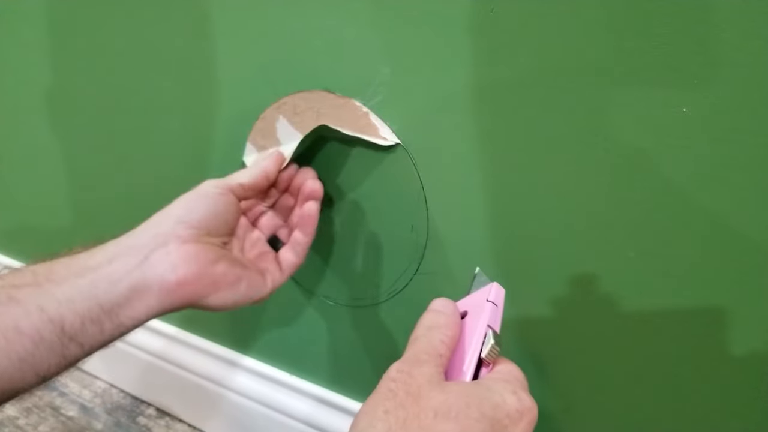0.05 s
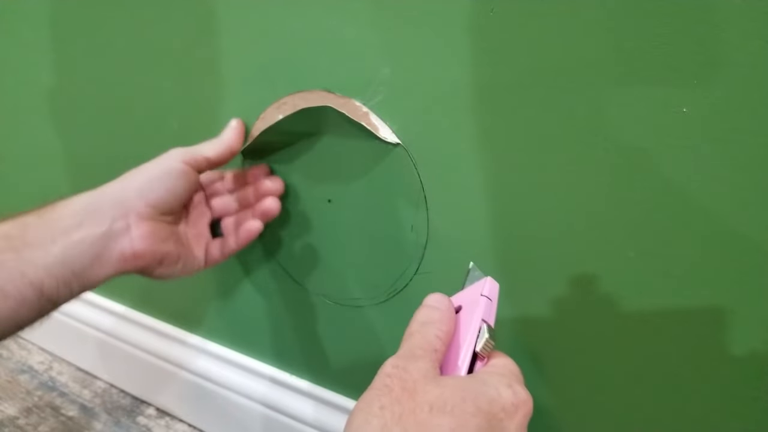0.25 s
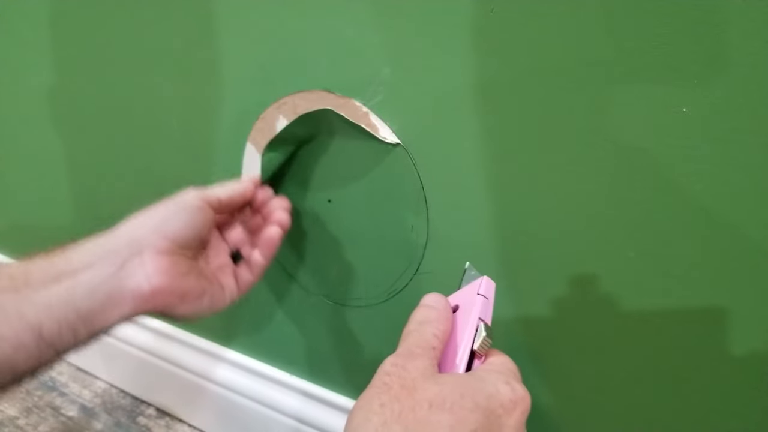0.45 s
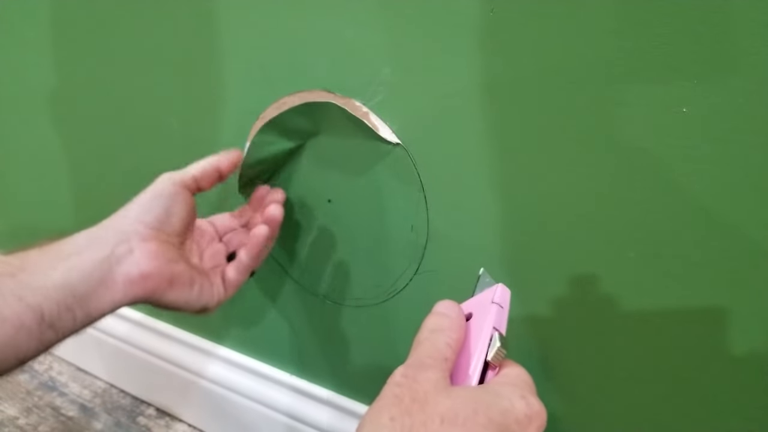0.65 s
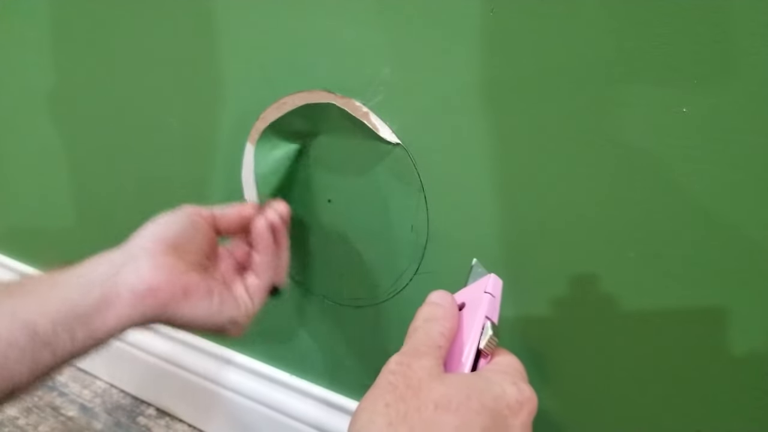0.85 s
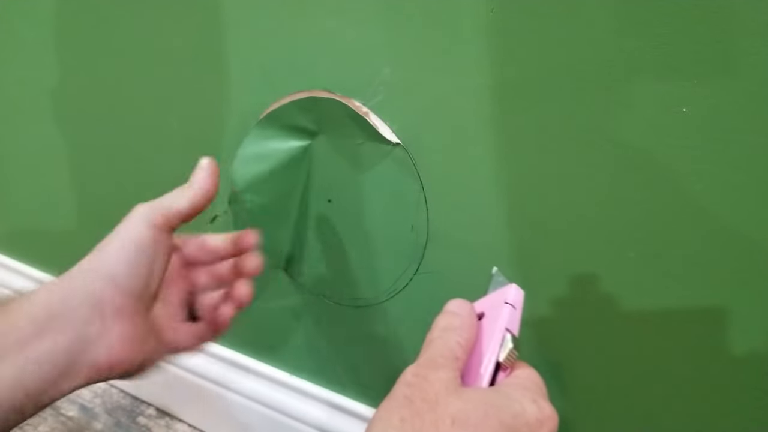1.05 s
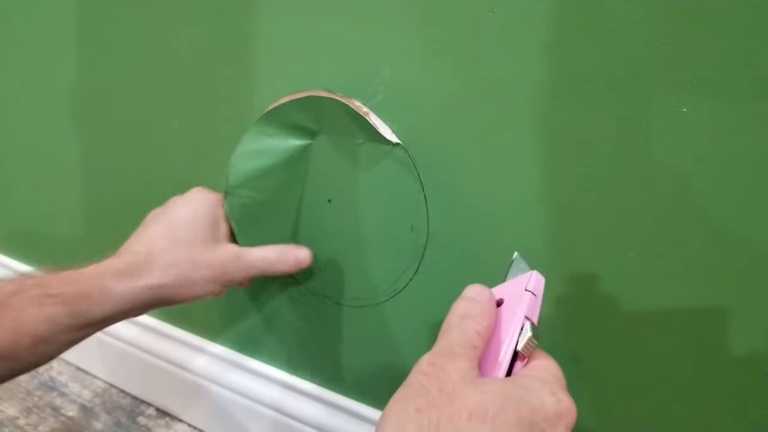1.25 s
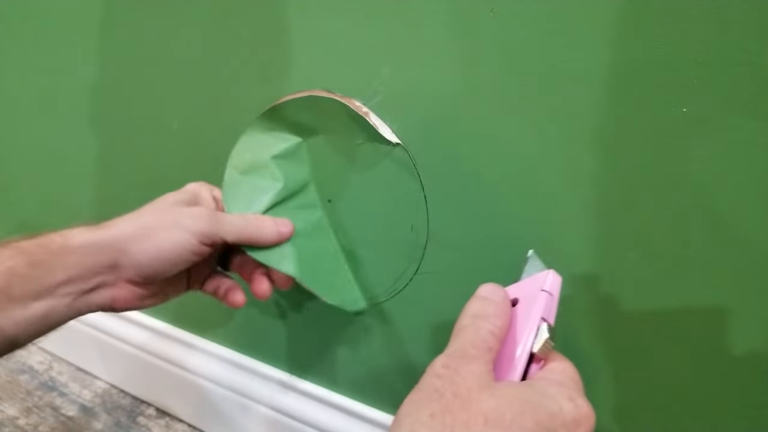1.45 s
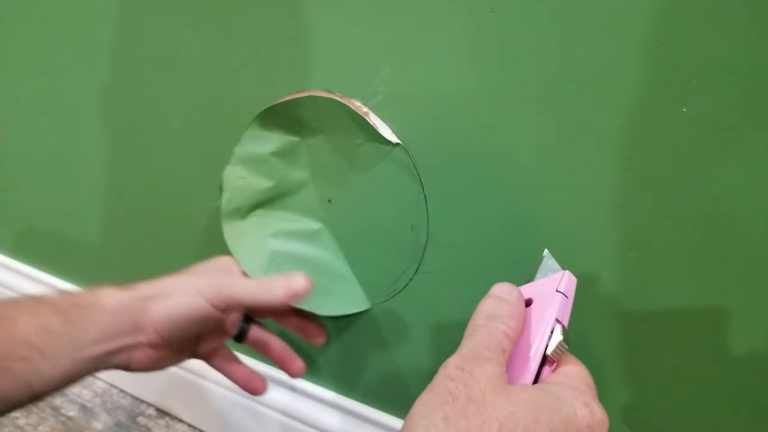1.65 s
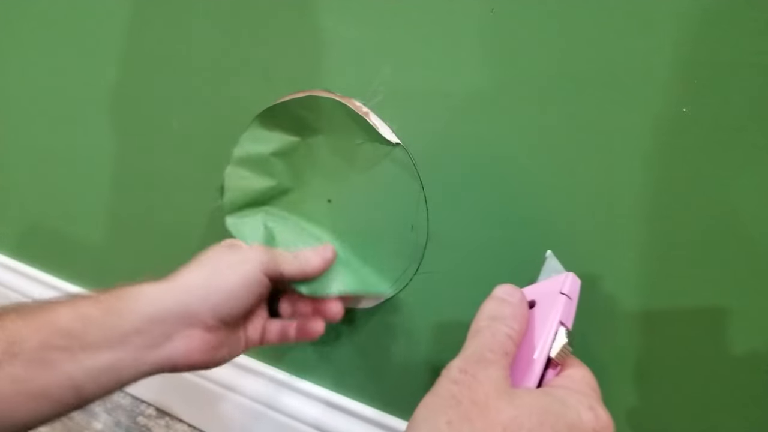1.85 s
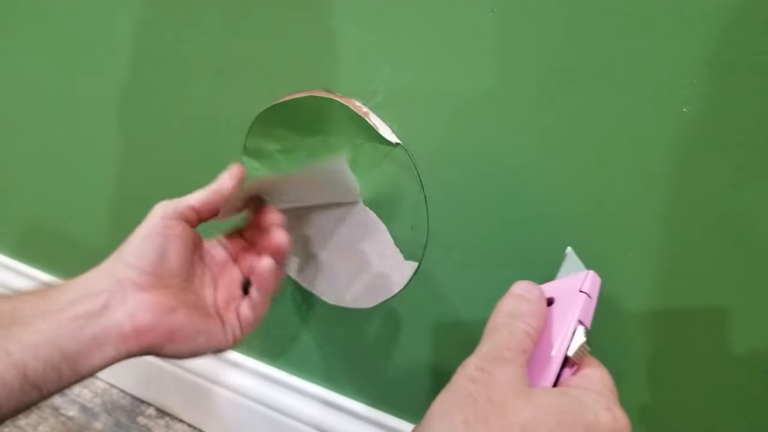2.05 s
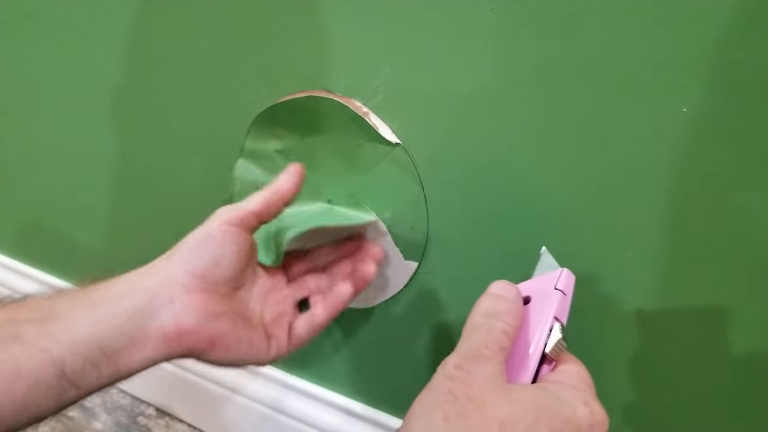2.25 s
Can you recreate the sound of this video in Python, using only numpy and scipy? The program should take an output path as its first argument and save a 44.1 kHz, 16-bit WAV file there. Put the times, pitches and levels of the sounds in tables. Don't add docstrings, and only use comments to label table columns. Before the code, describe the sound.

Painted paper is torn off drywall by hand in short uneven rips, with crisp snaps and soft hollow thumps of the board, pausing twice before more tearing, in a bare reverberant room, heard close on a phone.

```python
import sys
import numpy as np
from scipy import signal
from scipy.fft import rfft, irfft
from scipy.io import wavfile
from scipy.ndimage import uniform_filter1d

SR = 44100
rng = np.random.default_rng(int(sys.argv[2]) if len(sys.argv) > 2 else 0)


def bounce(signal):
    frames = np.transpose(np.atleast_2d(signal))
    limited = np.clip(frames, -1, 1)
    pcm = np.round(limited * 32767).astype(np.int16)
    wavfile.write(sys.argv[1], SR, pcm)


def natural_amplitude(level_db):
    exponent = np.asarray(level_db, float) / 20
    return 10 ** exponent


N = 101429
LN_60DB = np.log(1000)
SIDES = np.array([[1], [-1]])


def on_log(table, hz):
    f, v = np.array(table, float).T
    return np.interp(np.log(hz), np.log(f), v)


def unit(x):
    return x / np.sqrt(np.mean(x ** 2))


def equalise(x, table):
    hz = np.arange(N // 2 + 1) * SR / N + 1
    return irfft(rfft(x) * natural_amplitude(on_log(table, hz)), N)


def colour(x, table):
    return unit(equalise(x, table))


def band(x, hz, width_hz):
    return signal.lfilter(*signal.iirpeak(min(hz, .45 * SR), hz / width_hz, fs=SR), x)


def butter(x, order, hz, kind):
    return signal.sosfilt(signal.butter(order, hz, kind, fs=SR, output="sos"), x)


def clicks(rate_hz, scatter_db):
    hit = rng.random(N) < rate_hz / SR
    size_db = scatter_db * np.minimum(rng.exponential(size=N), 3.5)
    sign = rng.standard_normal(N).clip(-2, 2)
    return unit(hit * natural_amplitude(size_db) * sign)


def walk(rate_hz):
    k = int(SR / rate_hz)
    smooth = uniform_filter1d(rng.standard_normal(N), k)
    return unit(uniform_filter1d(smooth, k))


# (frequency [Hz], density [dB per Hz])
FLOOR = [(30, -27), (110, 14), (300, -7), (700, 2.5), (1500, -2.5), (5000, -5), (9000, -14), (16000, -34)]
# (time [s], level [dB])
HUM_DB = [
    (0, -45),
    (1.3, -49),
    (1.45, -57),
    (2.3, -48.5),
]


def background():
    floor_db, wide_above_hz = -46.5, 854
    hum_hz, hum_width_hz = 59, 5
    mid = colour(rng.standard_normal(N), FLOOR)
    side = butter(colour(rng.standard_normal(N), FLOOR), 1, wide_above_hz, "high")
    t = np.arange(N) / SR
    waver = unit(band(rng.standard_normal(N), hum_hz, hum_width_hz))
    hum = np.sqrt(2) * np.sin(2 * np.pi * hum_hz * t) + .5 * waver
    hum_db = np.interp(t, *np.array(HUM_DB).T)
    return natural_amplitude(floor_db) * (mid + side * SIDES) + hum * natural_amplitude(hum_db)


# (frequency [Hz], t60 [s])
ROOM_T60 = [(125, 0.22), (500, 0.67), (1500, 0.73), (4000, 0.68), (8000, 0.32), (14000, 0.33)]
# (frequency [Hz], level [dB])
ROOM_DB = [(125, -14), (500, -9), (1500, -1.5), (4000, -11), (8000, -2), (14000, -20)]


def room(x):
    build_s = .02
    t = np.arange(int(1.2 * SR)) / SR
    tail = 0
    for hz in 90 * 2 ** np.arange(0, 7.6, .5):
        noise = band(rng.standard_normal((2, len(t))), hz, hz / 2.78)
        noise = noise + max(0, 1 - hz / 1000) * 0.55 * noise[::-1]
        decay = np.exp(-LN_60DB * t / on_log(ROOM_T60, hz))
        fade = noise * decay * (t / build_s).clip(0, 1)
        level = np.sqrt(hz / SR / np.mean(np.sum(fade ** 2, 1)))
        tail = tail + natural_amplitude(on_log(ROOM_DB, hz)) * fade * level
    return signal.fftconvolve(x[None], tail, axes=1)[:, :N]


def earlier_rip():
    return natural_amplitude(-4.5) * (np.arange(N) < 40) * band(rng.standard_normal(N), 2800, 2600)


def pull(start_s, length_s):
    rise_share, release_s = .42, .012
    t = np.arange(N) / SR - start_s
    rise = np.clip(t / (rise_share * length_s), 0, 1)
    release = np.exp(-np.maximum(t - length_s, 0) / release_s)
    return np.sin(np.pi / 2 * rise) ** 2 * release


# (start [s], length [s], fibre hiss [dB], flap ring re hiss [dB], board boom re hiss [dB])
RIPS = [(-.02, 0.041, -38.5, -1, -3.5), (0.081, 0.067, -53, 9.5, 7), (0.242, .035, -58, 3, 17),
        (0.276, 0.041, -36, -5, -3.5), (0.371, 0.072, -29.5, -0.5, -4), (0.434, 0.039, -42, 17, -2),
        (0.58, 0.02, -36, -2, -16), (0.693, 0.033, -35, 4, -2.5), (0.781, 0.029, -38, 17.5, 0),
        (.8, 0.082, -26.5, 4.5, -4.5), (0.874, 0.097, -38, -13, -2.5), (1.207, 0.042, -67.5, 19, 29.5),
        (1.236, 0.086, -46.5, 10, 8.5), (1.311, 0.046, -35, 6.5, -4.5), (1.357, 0.068, -33, 3.5, 2.5),
        (1.413, 0.071, -45.5, -7, 3), (1.507, 0.014, -36, -2, -2), (1.709, 0.046, -54, 10, 22.5),
        (1.766, 0.033, -36.5, 0, -1), (1.821, 0.041, -38, -2, 3), (1.833, 0.035, -29.5, -5, 3.5),
        (1.863, 0.073, -30, -1.5, 4.5), (1.923, 0.11, -38.5, -4, 2.5), (2.11, 0.034, -51, -12, 8)]


def forces(column):
    total = 0
    for row in RIPS:
        db = row[2] + (row[column] if column else 0)
        total = total + pull(row[0], row[1]) * natural_amplitude(db)
    return total


# (frequency [Hz], density [dB per Hz])
HISS = [(400, 10), (1000, -5.5), (2000, -18.5), (4000, 6), (7000, -1), (11000, -1.5), (16000, -9)]
# (frequency [Hz], width [Hz], level [dB])
FLAP = [(770, 500, -13), (1700, 450, -1), (2190, 550, -1), (3050, 830, -0.5), (3820, 580, -1),
        (5000, 1400, -8), (6550, 1300, -7)]


def tear(patches):
    fibres = clicks(rate_hz=9000, scatter_db=2.5)
    flap = 0
    for k, (hz, width_hz, db) in enumerate(FLAP):
        part = np.roll(fibres, 997 * (k + 1)) * patches
        sway = natural_amplitude(2.2 * walk(70))
        flap = flap + natural_amplitude(db) * sway * band(part, hz, max(width_hz, hz / 4.5))
    hiss = colour(fibres * patches, HISS)
    return hiss * forces(column=0) * natural_amplitude(5.0) + unit(flap) * forces(column=3)


# (frequency [Hz], level [dB], t60 [s])
BOARD = [(139, -7, 0.027), (183, 5.5, 0.14), (228.6, 4, 0.16), (287.4, 2.5, 0.065), (333, -3, 0.1),
         (427, -7, 0.053), (656, -11, 0.017)]


def board(force):
    ring = sum(natural_amplitude(db) * band(force, hz, LN_60DB / np.pi / t60_s) for hz, db, t60_s in BOARD)
    return butter(ring, 3, 135, "high")


def boom():
    tugs = uniform_filter1d(clicks(rate_hz=800, scatter_db=1.8), size=30)
    return board(tugs * forces(column=4)) / np.std(board(tugs))


# (time [s], peak [dB], main mode [Hz])
TOUCHES = [(0.095, -27, 192), (0.206, -19.5, 191), (0.228, -18, 200), (0.393, -18, 181), (0.67, -23, 192),
           (0.682, -20, 182), (0.85, -22, 237), (0.89, -16, 186), (1.213, -21.5, 182), (1.301, -29, 328),
           (1.667, -22.5, 205), (1.687, -24.5, 273), (1.727, -27, 218), (1.749, -18.5, 360),
           (1.785, -17, 422), (1.841, -19.5, 665), (1.875, -40, 291), (1.884, -15, 200),
           (2.226, -34.5, 413), (2.286, -27.5, 338)]


def touches():
    push_ms, rise_s, t60_s, gain_db = 1.36, 0.00067, .042, 0.5
    size = 8000
    out, t = np.zeros(N + size), np.arange(size) / SR
    push = signal.windows.hann(int(push_ms * SR / 1000) + 2)
    rest = board(np.pad(push, (0, size - len(push))))
    neighbours = 0.17 * rest / np.abs(rest).max()
    envelope = np.exp(-LN_60DB * t / t60_s) * (1 - np.exp(-t / rise_s))
    for s, db, hz in TOUCHES:
        knock = np.sin(2 * np.pi * hz * t) * envelope + neighbours
        i = int(s * SR)
        out[i:i + size] -= natural_amplitude(db + gain_db) * knock
    return butter(out[:N], 2, 90, "high")


# (time [s], peak [dB], ring [Hz], length [ms])
SNAPS = [(0.433, -3.5, 1686, 3.76), (0.7881, -7, 2800, 2), (0.8865, -8.5, 7200, 3.2),
         (1.259, -18.5, 2240, 3.5), (1.3004, -24, 2440, 2.9), (1.3266, -13.5, 990, 2),
         (1.3406, -4, 2280, 2.76), (1.3511, -8, 2580, 4.4), (1.5118, -23.5, 1920, 4.4),
         (1.7325, -28.5, 2050, 5.7), (1.7498, -14, 1950, 3.8), (1.7744, -12, 7460, 3.6),
         (1.7858, -18.5, 2140, 8.5), (1.8183, -21, 1270, 1.5), (1.8413, -3.5, 2290, 2.86),
         (1.92, -8, 6470, 4.4), (2.15, -37, 3840, 4.1), (2.2256, -45, 1335, 3.1), (2.2858, -31, 2160, 2.5)]


def snaps():
    ring_share, ring_q, edge, attack_s, gain_db = .28, 2.5, .15, .0003, 5
    size = 2000
    out, t = np.zeros(N + size), np.arange(size) / SR
    for s, db, hz, ms in SNAPS:
        gate = (t / attack_s).clip(0, 1) * np.exp(-(t * 1000 / ms) ** 4)
        burst = rng.standard_normal(size) * gate
        wide = butter(burst, 2, [1100, 6800], "band") + edge * burst
        ring = band(band(burst, hz, hz / ring_q), hz, hz / ring_q)
        crack = ring_share * ring / np.abs(ring).max() + (1 - ring_share) * wide / np.abs(wide).max()
        i = int(s * SR)
        out[i:i + size] += natural_amplitude(db + gain_db) * crack / np.abs(crack).max()
    return out[:N]


def reflections(x):
    echo = rng.standard_normal((2, 300)) * np.exp(-np.arange(300) / 60.)
    echo = np.diff(echo, axis=1, prepend=0)
    echo = echo / np.sqrt(np.sum(echo ** 2, 1))[:, None]
    return signal.fftconvolve(x[None], echo, axes=1)[:, :N]


def scene():
    pan_db, room_pan_db, port_lag_s, port_spread = 2.5, 2.86, .0001, .45
    edge_share, boom_left_db, patchy_db = .55, 2, 1.4
    patches = natural_amplitude(patchy_db * walk(100))
    middle = tear(patches)
    ends = np.array([tear(patches), tear(patches)])
    low = touches() + boom()
    solid = snaps() + low
    wall = solid + np.sqrt(1 - edge_share) * middle
    n = np.arange(N)
    lagged = np.interp(n - port_lag_s * SR, n, wall)
    near = np.array([wall, lagged]) + np.sqrt(edge_share) * ends
    near[0] += (natural_amplitude(boom_left_db) - 1) * low
    near = near + port_spread * reflections(wall)
    far = room(solid + middle + earlier_rip())
    return near * natural_amplitude(SIDES * pan_db / 2) + far * natural_amplitude(SIDES * room_pan_db / 2) + background()


# (frequency [Hz], level [dB])
PHONE = [(40, -1.5), (80, -4), (6900, -0.5), (7900, -9), (8900, -12), (10300, -5), (12000, 4), (15600, 7)]


def phone(x):
    x = 1.3 * np.tanh(equalise(x, PHONE) / 1.3)
    x = signal.sosfilt(signal.ellip(10, .3, 80, 15850, fs=SR, output="sos"), x)
    return butter(x, 4, 46, "high")


def roll_off(x):
    return signal.sosfilt(signal.butter(12, 16820, fs=SR, output="sos"), x)


def record(dry):
    mix = phone(dry)
    return roll_off(mix)


dry = scene()
out = record(dry)
bounce(out)
```